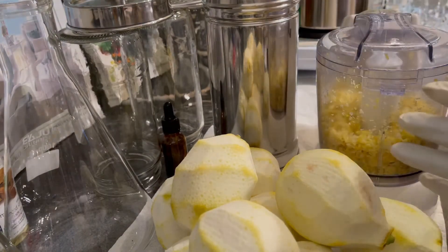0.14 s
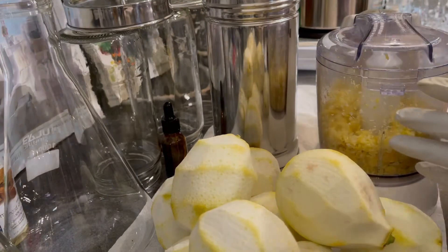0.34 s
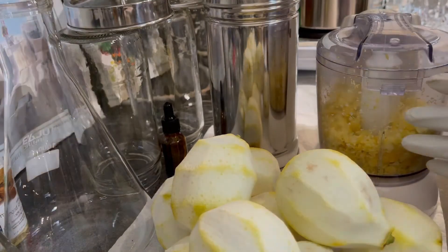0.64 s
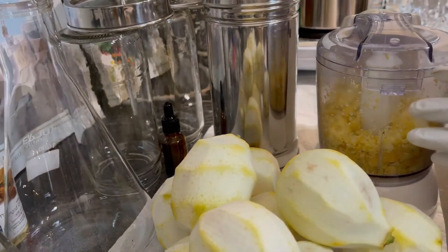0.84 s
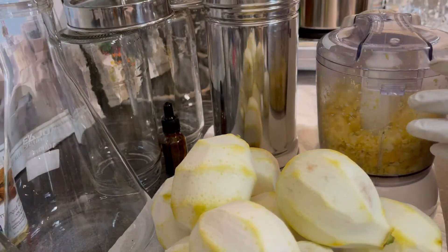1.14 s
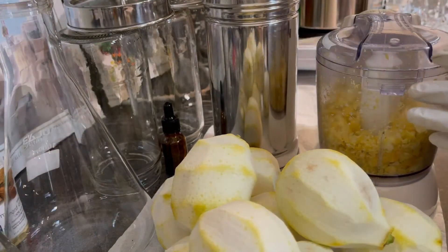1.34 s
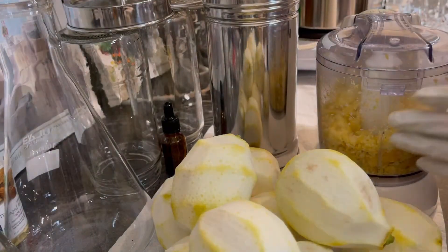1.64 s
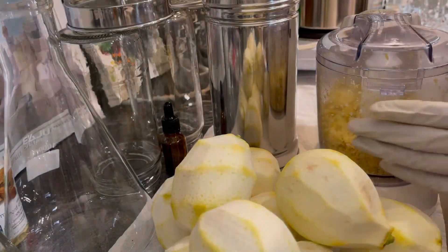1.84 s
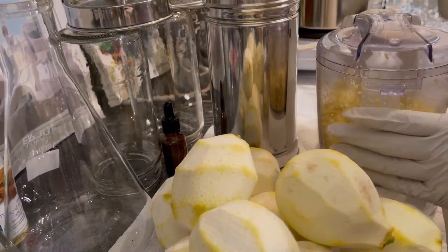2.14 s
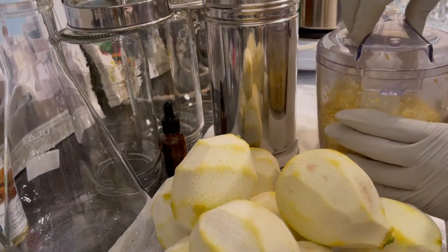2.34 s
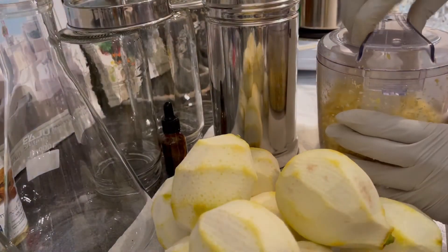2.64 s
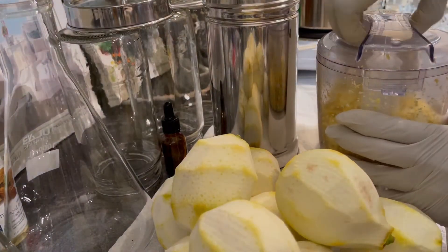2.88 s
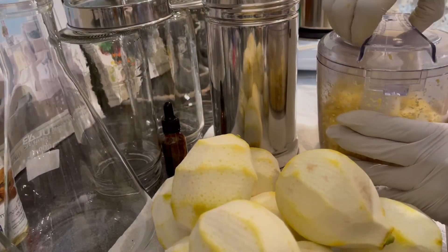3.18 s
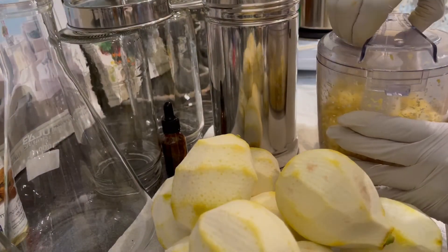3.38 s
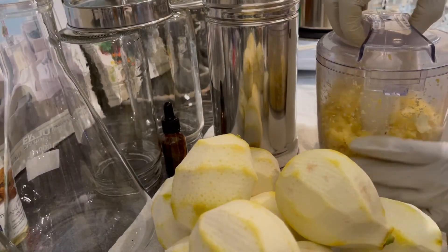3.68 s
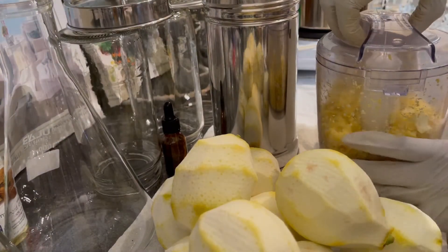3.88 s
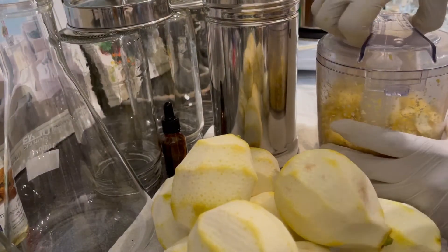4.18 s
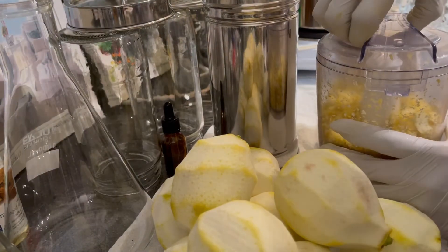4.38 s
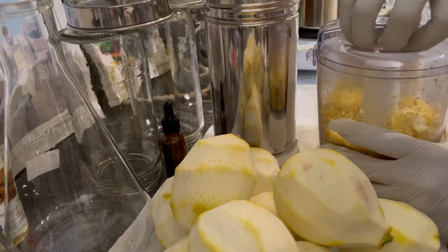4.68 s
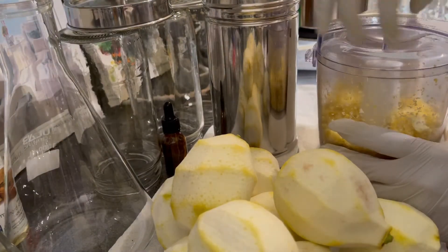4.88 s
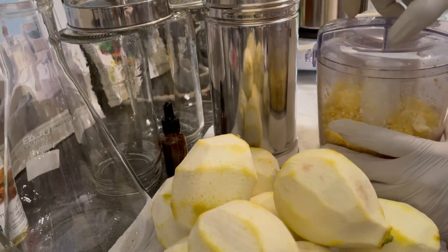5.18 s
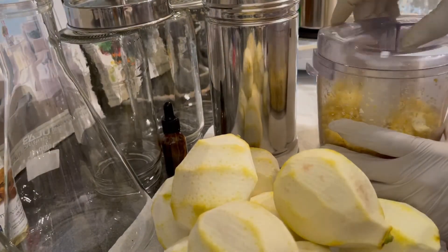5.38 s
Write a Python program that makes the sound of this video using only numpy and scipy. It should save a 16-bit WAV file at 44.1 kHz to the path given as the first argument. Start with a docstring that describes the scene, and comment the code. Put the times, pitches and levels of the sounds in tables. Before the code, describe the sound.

A quiet kitchen with a faint steady rumble and hiss. In the first half second, sticky rubber gloves peel off a food chopper's plastic bowl with two tiny bright ticks. From about 0.6 seconds, things nudged further off knock lightly, with a soft thud near 1.1 and a clearer knock at 1.5. At about 2.2 seconds the bowl bumps hollowly against its base, followed by faint knocks, ticks and soft glove rubbing until 4.3. At about 4.5 seconds the lid lets go with a loud, ringing plastic snap, followed by a low bump and a faint ping of the steel blade. The lid is tapped near 5.1, scrapes over the rim with a short high squeak around 5.3, and knocks down hard on the bowl at 5.4. The snap and this last knock briefly overload the microphone.

```python
"""Gloves tick and rub softly on the plastic bowl of a small food chopper, idle in a quiet kitchen.
Things are nudged further off and the bowl knocks against its base. The lid lets go with a loud snap,
is tapped, squeaks over the rim and knocks down on the bowl. Each knock makes the struck part ring;
rubbing is noise made of tiny slips. The two hardest blows overload the microphone."""
import sys
import numpy as np
from scipy import signal
from scipy.fft import rfft, irfft, next_fast_len
from scipy.io import wavfile
from scipy.ndimage import uniform_filter1d

SR = 44100
rng = np.random.default_rng(int(sys.argv[2]) if len(sys.argv) > 2 else 0)


def write(x):
    x = np.atleast_2d(x).T
    wavfile.write(sys.argv[1], SR, np.round(np.clip(x, -1, 1) * 32767).astype(np.int16))


N = 243431
TIME = np.arange(N) / SR
AGE = TIME[:int(.7 * SR)]   # seconds since a hit

# the notes that bowl and lid ring with: pitch_hz, level_db, ring_s (time to fade by 60 dB)
BOWL_NOTES = [(325, -18, .2), (429, -26, .24), (508, -24, .22), (790, -28, .2), (1021, -29, .17),
              (1114, -27, .15), (1283, -27, .2), (1550, -20, .2), (1640, -29, .22), (1867, -21, .22),
              (2148, -25, .22), (2346, -23, .18), (2453, -26, .17), (2585, -28, .17), (2874, -27, .17),
              (3183, -26, .16), (4290, -25, .14), (4908, -27, .14), (5095, -24, .14), (5165, -25, .14),
              (6345, -26, .15)]
LID_NOTES = [(310, -14, 0.067), (446, -8.5, 0.1), (571, -11.5, 0.054), (686, -11, 0.13), (821, -32, 0.2),
             (928, -24, 0.049), (1110, -21, 0.19), (1586, -17, 0.18), (3050, -29, 0.0085), (3156, 0, 0.017)]
# the bowl's tone colour, or how strong each pitch is: pitch_hz, level_db
BOWL_COLOUR = [(110, 0.5), (1000, -4), (2400, -1), (3200, -2.5), (3700, -3.5), (5100, 3.5), (6500, -1.5),
               (10500, -1.5), (15500, -20)]


def from_db(db):
    """Turn decibels into a gain."""
    return 10 ** (np.asarray(db) / 20)


def rms_one(x):
    """Scale a sound to an average power of 1."""
    return x / np.sqrt(np.mean(x ** 2) + 1e-20)


def in_time(rows):
    """Join timed points into smooth curves, one for each column after the time."""
    times, *columns = np.transpose(rows)
    return [np.interp(TIME, times, column) for column in columns]


def at_hz(points, hz):
    """Read a curve at a given pitch."""
    pitches, values = np.transpose(points)
    return np.interp(np.log(np.maximum(hz, 1)), np.log(pitches), values)


def add(track, start_s, sound):
    """Mix a sound in at a time."""
    start = int(start_s * SR)
    track[start:start + len(sound)] += sound[:N - start]


def fade(ring_s):
    """A level that falls 60 dB in ring_s seconds."""
    return np.exp(-np.log(1000) * AGE / max(ring_s, 1e-3))


def ring(pitch_hz, level_db, ring_s):
    """One struck note dying away."""
    return from_db(level_db) * fade(ring_s) * np.sin(2 * np.pi * pitch_hz * AGE)


def band(x, low_hz, high_hz):
    """Keep the sound between two pitches."""
    edges_hz = [low_hz, min(high_hz, SR / 2 - 1000)]
    return signal.sosfilt(signal.butter(3, edges_hz, "band", fs=SR, output="sos"), x)


def shaped(x, colour):
    """Give a sound a tone colour."""
    size = next_fast_len(len(x))
    hz = np.arange(size // 2 + 1) * SR / size
    return irfft(rfft(x, size) * from_db(at_hz(colour, hz)), size)[:len(x)]


def coloured(x, colour):
    """Give a sound a tone colour and an average power of 1."""
    return rms_one(shaped(x, colour))


def resonant(x, notes, peak_db, width_hz=30):
    """Sound passing through an object grows stronger near each of its notes."""
    size = next_fast_len(len(x))
    hz = np.arange(size // 2 + 1) * SR / size
    peaks = sum(1 / (1 + (2 * (hz - pitch_hz) / width_hz) ** 2) for pitch_hz, _, _ in notes)
    return irfft(rfft(x, size) * (1 + from_db(peak_db) * peaks), size)[:len(x)]


def room_tone(level_db=-41.5):
    """The kitchen's own steady rumble and hiss."""
    # its tone colour: pitch_hz, level_db
    colour = [(10, 1.5), (17, 6.5), (35, -4), (60, -16), (115, -22.5), (390, -36.5), (800, -38),
              (1200, -44.5), (2400, -48), (8000, -53.5), (15600, -56)]
    return from_db(level_db) * coloured(rng.standard_normal(N), colour)


def friction(grain_hz, grain_db):
    """Rubbing makes noise in small uneven slips."""
    slips = np.interp(TIME * grain_hz, np.arange(N), rng.standard_normal(N))
    return rng.standard_normal(N) * from_db(grain_db * slips)


def strokes(moves):
    """A hand speeds up and slows down in each stroke, and the level follows."""
    return sum(from_db(level_db) * np.sin(np.pi * np.clip((TIME - start_s) / length_s, 0, 1))
               for start_s, length_s, level_db in moves)


def gloves(resting_rub_db=-69.5, resting_swish_db=-73):
    """Palms rub dully, fingertips swish and sticky rubber peels off; the hands are never quite still."""
    # hand strokes on the plastic: start_s, length_s, level_db
    rubs = [(1.09, 0.26, -49), (1.6, 0.39, -66), (2.3, 0.23, -60), (2.67, 0.086, -51.5),
            (3.46, 0.23, -59.5), (3.74, 0.16, -59.5), (3.89, 0.18, -57.5), (4.17, 0.067, -56),
            (4.33, 0.25, -54.5), (4.76, 0.23, -60)]
    swishes = [(.26, .15, -71), (.92, .16, -74), (1.21, 0.19, -65), (1.62, .13, -68.5), (1.82, 0.14, -64.5),
               (2.28, 0.088, -60.5), (2.46, 0.077, -58.5), (2.58, 0.11, -63), (2.81, .17, -63),
               (3.46, 0.2, -61), (4.15, 0.1, -69), (4.87, 0.16, -61)]
    peels = [(.06, 0.14, -59.5), (.39, .14, -60.5)]
    # their tone colours: pitch_hz, level_db
    rub_colour = [(100, -4.5), (330, 6.5), (900, -2), (1800, -6.5), (3000, -14.5), (6000, -26),
                  (16000, -35)]
    swish_colour = [(500, -20.5), (2000, 0.5), (3500, -5.5), (5000, -3), (8000, -3), (10500, -3.5),
                    (13000, -16), (16000, -16)]
    peel_colour = [(500, -20), (2000, -12), (2500, 6.5), (2900, 3.5), (3600, -10), (5000, 2), (7000, -5),
                   (10000, -11), (16000, -33)]
    rub = coloured(friction(grain_hz=257, grain_db=1.5), rub_colour)
    swish = coloured(friction(grain_hz=720, grain_db=3.5), swish_colour)
    peel = coloured(friction(grain_hz=535, grain_db=2.5), peel_colour)
    rub *= from_db(resting_rub_db) + strokes(rubs)
    swish *= from_db(resting_swish_db) + strokes(swishes)
    return rub + swish + peel * strokes(peels)


def kitchen_echo(sound, noise, room_db, build_s=.008):
    """An echo made of noise, scaled to the sound's energy; it swells and dies sooner in the treble."""
    # how long the room rings: pitch_hz, ring_s
    ring_times = [(150, 0.61), (700, 0.36), (2500, 0.36), (6000, 0.33), (10000, 0.35), (15000, 0.2)]
    edges_hz = [110, 300, 1000, 3000, 7000, 11000, 16000]
    echo = sum(band(noise, low, high) * fade(at_hz(ring_times, np.sqrt(low * high)))
               for low, high in zip(edges_hz, edges_hz[1:]))
    echo *= 1 - np.exp(-AGE / build_s)
    return from_db(room_db) * np.linalg.norm(sound) * echo / np.linalg.norm(echo)


def glove_ticks(ring_s=0.0062):
    """A sticky glove lets go of the plastic with tiny bright snaps."""
    # the snaps: start_s, level_db, pitch_hz
    ticks = [(0.065, -32.5, 5160), (0.4053, -29, 5300), (0.657, -44, 3900), (2.085, -45.5, 4800),
             (2.571, -43, 11000), (2.7031, -33, 7400), (4.1123, -36, 5300), (4.278, -36.5, 4570)]
    out = np.zeros(N)
    for start_s, level_db, hz in ticks:
        colour = [(hz / 8, -14), (hz / 2, -6), (hz, 0), (hz * 1.6, -6), (hz * 2.5, -22)]
        noise, echo_noise = [shaped(white, colour) for white in rng.standard_normal((2, len(AGE)))]
        snap = noise * fade(ring_s)
        snap = from_db(level_db) * snap / np.abs(snap).max()
        add(out, start_s, snap + kitchen_echo(snap, echo_noise, room_db=-9))
    return out


def bumps(swell_cycles=0.13):
    """Each soft push rings one low note, which takes part of a cycle to swell."""
    # hand bumps and the bowl's hollow note: start_s, level_db, pitch_hz, ring_s
    thuds = [(0.067, -42.5, 184, 0.048), (0.406, -38.5, 187, 0.036), (1.126, -26, 179, 0.079),
             (1.162, -26.5, 199, 0.064), (2.245, -29, 118, 0.21), (2.26, -25, 338.5, 0.11),
             (2.624, -33, 435, 0.058), (2.628, -44.5, 890, 0.071), (4.456, -17.5, 164, 0.2),
             (4.46, -14, 325, .24), (4.5984, -9.5, 114, 0.031), (4.602, -12.5, 276, 0.023),
             (5.055, -37.5, 101, 0.3), (5.057, -31, 310, .1), (5.39, -29, 267, 0.14),
             (5.404, -5, 323, 0.13)]
    # the motor base swaying on its rubber feet: same columns
    sways = [(1.15, -18, 18, .4), (2.285, -26, 35, .55), (4.5, -20, 28, .5)]
    out = np.zeros(N)
    for start_s, level_db, pitch_hz, ring_s in thuds + sways:
        swell = 1 - np.exp(-AGE * pitch_hz / swell_cycles)
        add(out, start_s, ring(pitch_hz, level_db, ring_s) * swell)
    return out


def struck_spot(x, spot_hz, lift_db=5, sharpness=3.1):
    """The place that is struck brings out the notes around one pitch."""
    b, a = signal.iirpeak(min(spot_hz, .4 * SR), sharpness, fs=SR)
    return x + (from_db(lift_db) - 1) * signal.lfilter(b, a, x)


def blows(hits, notes, colour, bands_db, notes_db, crack_db, bounce, room_db, pivot_hz=545):
    """A hit and its quick bounces make a crack, a noisy blur of ringing and some clear notes."""
    # borders of five bands, bass to treble: pitch_hz
    edges_hz = [110, 270, 1100, 3300, 8000, 15500]
    out = np.zeros(N)
    attack = SR // 50   # the first 20 ms
    for start_s, level_db, hardness_db, ring_s, rattle_ms, spot_hz in hits:
        force = np.zeros(2 * attack)
        force[0] = 1
        bounces = np.clip(rng.random(6) * rattle_ms * SR / 1000, 1, len(force) - 1).astype(int)
        force[bounces] += bounce * rng.uniform(0.38, 1, len(bounces))
        # every contact adds its energy to the object
        decay = fade(ring_s) + from_db(crack_db) * fade(0.022)
        energy = np.abs(signal.fftconvolve(decay ** 2, force ** 2)[:len(AGE)]) / np.sum(force ** 2)
        noise, echo_noise = [resonant(shaped(white, colour), notes, peak_db=-1.5)
                             for white in rng.standard_normal((2, len(AGE)))]
        blur = noise * np.sqrt(energy)
        clear = sum(rng.choice([-1, 1]) * ring(hz, db + notes_db, note_s) for hz, db, note_s in notes)
        sound = blur + clear + kitchen_echo(blur, echo_noise, room_db)
        # a hard hit lifts the bands above pivot_hz, a padded one lowers them
        blow = 0
        for low, high, band_db in zip(edges_hz, edges_hz[1:], bands_db):
            part = band(sound, low, high)
            octaves = np.log2(np.sqrt(low * high) / pivot_hz)
            gain = from_db(level_db + band_db + hardness_db * octaves)
            blow = blow + gain * part / np.std(part[:attack])
        add(out, start_s, struck_spot(blow, spot_hz))
    return out


def far_knocks():
    """Things nudged further along the counter knock and set the room echoing."""
    # the knocks: start_s, level_db, hardness_db_per_octave, ring_s, rattle_ms, spot_hz
    hits = [(0.608, -49.5, -2.5, 0.19, 6, 630), (0.695, -53.5, -3.5, 0.15, 5.8, 580),
            (0.778, -56, -2.5, 0.17, 6.8, 614), (1.081, -51, -3, 0.11, 3.3, 660),
            (1.124, -52, -0.5, .05, 3.4, 3000), (1.163, -53, 1, 0.083, 13, 1800),
            (1.178, -45, 1.5, 0.11, 17, 3040), (1.352, -47, -2.9, .05, 2, 1600),
            (1.3875, -36, -1.1, 0.11, 6.5, 1460), (1.4763, -24, 0, .11, 2.3, 560),
            (4.279, -53, -6, 0.3, 6.2, 810)]
    # the notes they ring with: pitch_hz, level_db, ring_s
    notes = [(409, -28, .22), (512, -22, .23), (640, -26, .3), (715, -28, .22), (839, -23, .25),
             (916, -27, .22), (1040, -24, .2), (1270, -25, .17), (1446, -23, .15), (1910, -27, .2),
             (3994, -33, .18), (4495, -32, .2), (4775, -32, .21), (5383, -32, .19), (5582, -32, .2),
             (6455, -33, .18)]
    # their tone colour: pitch_hz, level_db
    colour = [(300, -3.5), (450, 5), (1000, 1.5), (1900, 4), (2350, -3.5), (2900, -11), (3600, -6),
              (5200, 0), (8000, -9), (11000, -6), (13000, -17.5), (15500, -25.5)]
    # strength of each band, bass to treble: level_db
    bands_db = [-16.5, -1.5, -4.5, -10, -20.5]
    return blows(hits, notes, colour, bands_db, notes_db=5, crack_db=-2.5, bounce=0.93, room_db=-5)


def bowl_knocks():
    """The bowl rings as it knocks against its base and its lid."""
    # the knocks: start_s, level_db, hardness_db_per_octave, ring_s, rattle_ms, spot_hz
    hits = [(2.24, -34, -5, 0.11, 13.3, 520), (2.2595, -33.5, -6, .063, 1.8, 340),
            (2.4415, -42, -3.5, 0.11, 6.4, 1290), (2.995, -57, -2, 0.078, 14, 610),
            (3.025, -55, -7.5, 0.045, 7, 520), (3.0625, -45.5, -4.3, 0.024, 8.2, 3470),
            (3.2195, -51, -4.5, 0.08, 8.7, 470), (3.3, -60, -5.5, 0.045, 3, 500),
            (3.359, -46.5, -4, 0.25, 17, 1370), (3.372, -47.5, -6, 0.17, 17, 480),
            (3.701, -53, -0.5, 0.17, 7.3, 1240), (3.998, -52.5, -0.7, 0.19, 3.6, 1800),
            (4.072, -55, -5.5, .05, 3.1, 900), (4.088, -51, -3, 0.075, 8.9, 400),
            (4.4572, -8, 0, 0.12, 12, 1693), (5.302, -37, -8.5, 0.033, 4.8, 400)]
    # strength of each band, bass to treble: level_db
    bands_db = [-15, 0, 1.5, -1, -8]
    return blows(hits, BOWL_NOTES, BOWL_COLOUR, bands_db,
                 notes_db=0, crack_db=3.5, bounce=0.55, room_db=-14.5)


def lid_taps():
    """The light lid clacks as it is touched, tapped and set down."""
    # the taps: start_s, level_db, hardness_db_per_octave, ring_s, rattle_ms, spot_hz
    hits = [(3.529, -64.5, 4, 0.031, 5.6, 9200), (3.5752, -68, 7, 0.018, 1.5, 13000),
            (4.612, -54, 3.5, 0.32, 8.7, 9400), (4.735, -45, 0, 0.18, 15, 5200),
            (5.0553, -25, -0.45, 0.11, 0.68, 2690), (5.4038, -15, 0.05, 0.14, 6, 1840)]
    # the lid's tone colour: pitch_hz, level_db
    colour = [(200, -5), (300, 6), (1400, 5), (2800, 4.5), (3200, -1), (3600, 2.5), (5000, 15),
              (11000, 5.5), (13000, 4), (15500, -19)]
    # strength of each band, bass to treble: level_db
    bands_db = [-14, 1, 0, -5.5, -14]
    return blows(hits, LID_NOTES, colour, bands_db, notes_db=2, crack_db=7, bounce=0.65, room_db=-14.5)


def tab_slips():
    """The lid's locking tabs slip and ring the bowl just before the lid snaps free or settles."""
    # the slips: start_s, level_db, hardness_db_per_octave, ring_s, rattle_ms, spot_hz
    hits = [(4.443, -43, 0, .1, 6.5, 2900), (4.4503, -30.5, 2.5, .1, 4.1, 1200),
            (4.4538, -17, 0.2, .06, 2.3, 1200), (5.3888, -23, 0.1, .04, 2.4, 2900)]
    # strength of each band, bass to treble: level_db
    bands_db = [-4, -2, -12.5, -16.5, -24.5]
    return blows(hits, BOWL_NOTES, BOWL_COLOUR, bands_db,
                 notes_db=-6, crack_db=-8, bounce=0.94, room_db=-5.5)


def blade_ping(start_s=4.6125):
    """The steel blade rings faintly when jogged."""
    # its notes: pitch_hz, level_db, ring_s
    notes = [(6300, -54.5, 0.61), (6400, -58, .37), (9270, -49, 0.22), (9480, -55, 0.2), (13450, -65, 0.22)]
    out = np.zeros(N)
    add(out, start_s, sum(ring(*note) for note in notes))
    return out


def lid_slide(waver_hz=170):
    """The lid scrapes over the rim, and its edge squeaks as it sticks and slips."""
    # the scrape's loudness: time_s, level_db
    slide = [(5.245, -67), (5.266, -39), (5.29, -34.5), (5.32, -38.5), (5.35, -42), (5.375, -38),
             (5.395, -34), (5.41, -42), (5.43, -81)]
    # its tone colour: pitch_hz, level_db
    colour = [(120, -42.5), (200, -22), (244, -16), (327, -3.5), (462, -8), (585, -19), (827, -12.5),
              (1590, -9), (2060, -11.5), (2960, -15.5), (3960, -16.5), (9660, -16), (15500, -32)]
    # the squeak's path: time_s, pitch_hz, level_db
    squeak_path = [(5.25, 2756, -75), (5.27, 2810, -42), (5.32, 3050, -41), (5.375, 2820, -52),
                   (5.386, 2790, -27), (5.393, 3240, -33), (5.398, 3260, -72)]
    scrape_db, = in_time(slide)
    rubbing = resonant(friction(grain_hz=600, grain_db=1), LID_NOTES, peak_db=5)
    scrape = from_db(scrape_db) * coloured(rubbing, colour)
    pitch_hz, squeak_db = in_time(squeak_path)
    pitch_hz += waver_hz * rms_one(uniform_filter1d(rng.standard_normal(N), size=50))
    squeak = from_db(squeak_db) * np.sin(2 * np.pi * np.cumsum(pitch_hz) / SR)
    touching = (TIME > slide[0][0]) & (TIME < slide[-1][0])
    return touching * (scrape + squeak)


def scene():
    """The knocks, the hands and the quiet kitchen, in one channel."""
    knocks = bowl_knocks() + tab_slips() + lid_taps() + far_knocks()
    return (knocks + room_tone() + glove_ticks() + bumps() + blade_ping() + gloves() + lid_slide())[None]


def record(dry, limit=.97, cutoff_hz=15750):
    """The microphone overloads on the loudest peaks, then the highest treble is cut."""
    clipped = np.clip(dry, -limit, limit)
    return signal.sosfilt(signal.ellip(10, .1, 70, cutoff_hz, fs=SR, output="sos"), clipped)


dry = scene()
out = record(dry)
write(out)
```